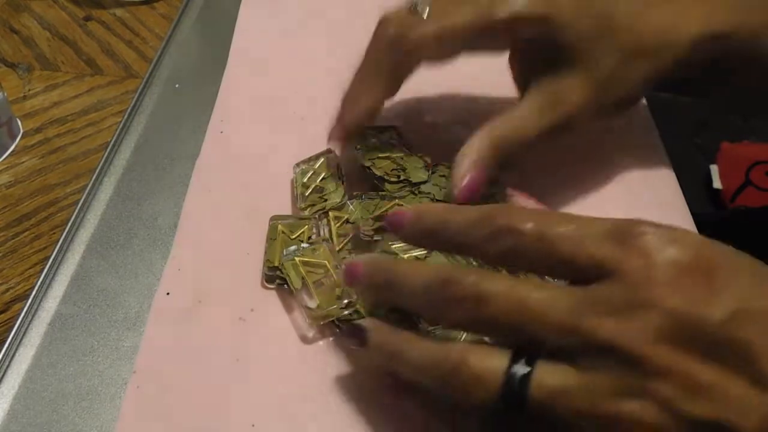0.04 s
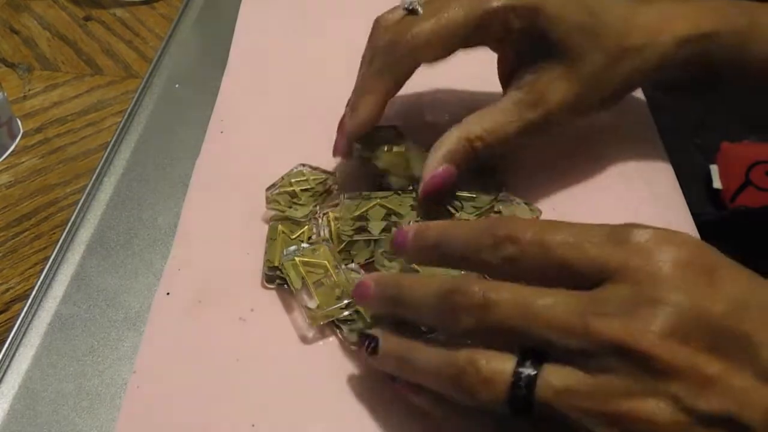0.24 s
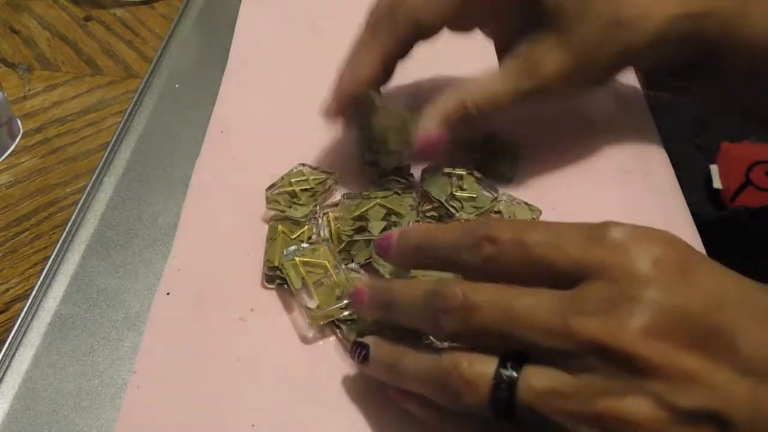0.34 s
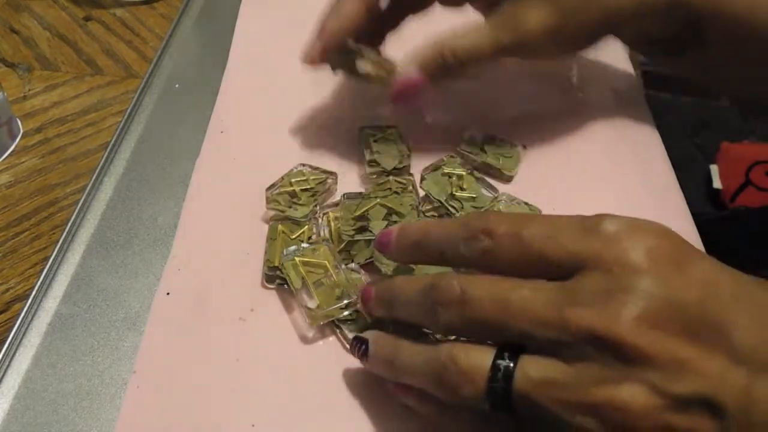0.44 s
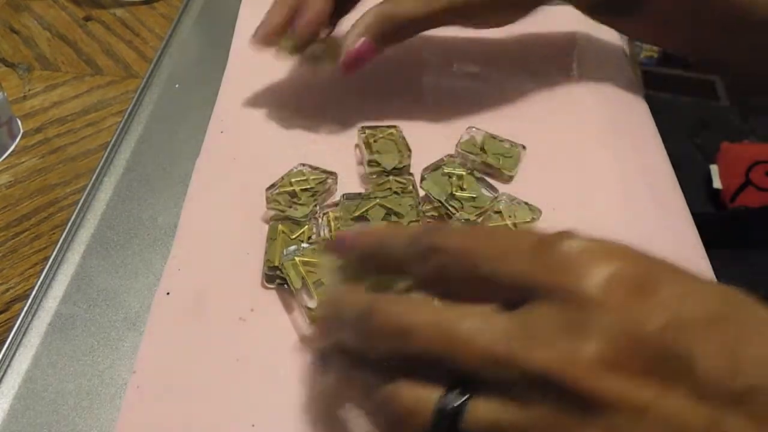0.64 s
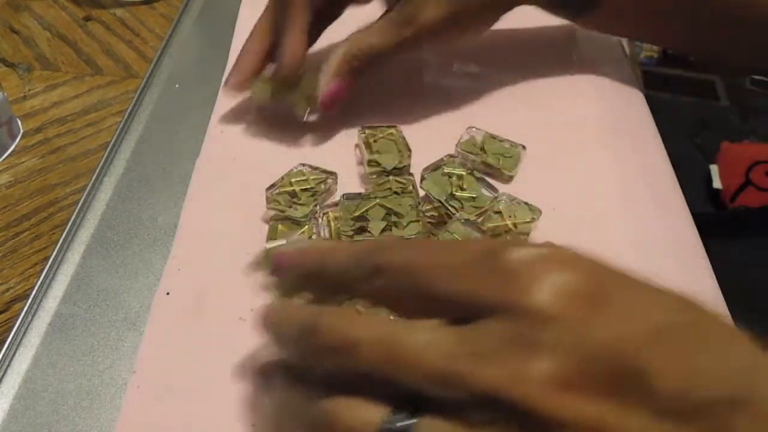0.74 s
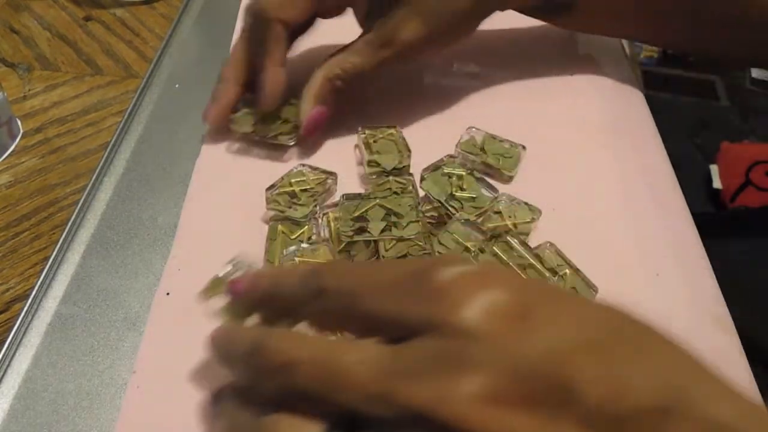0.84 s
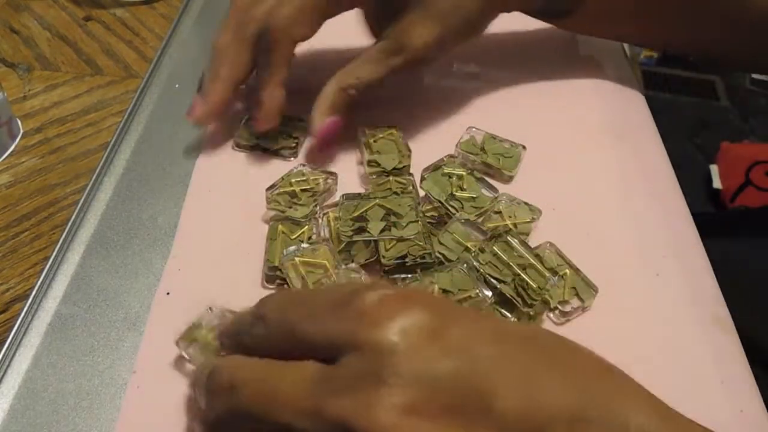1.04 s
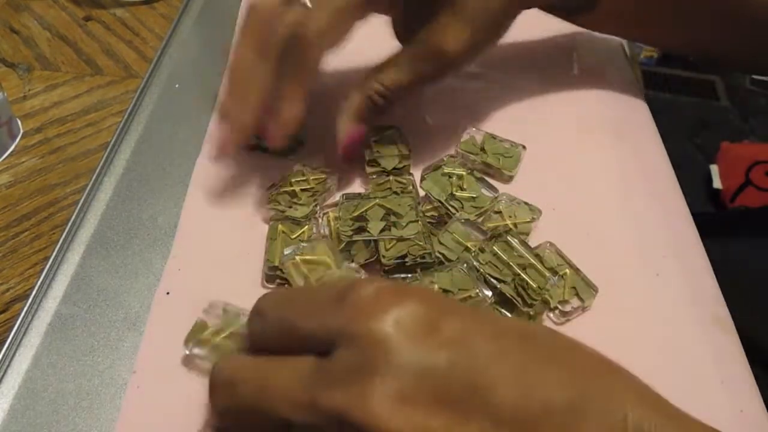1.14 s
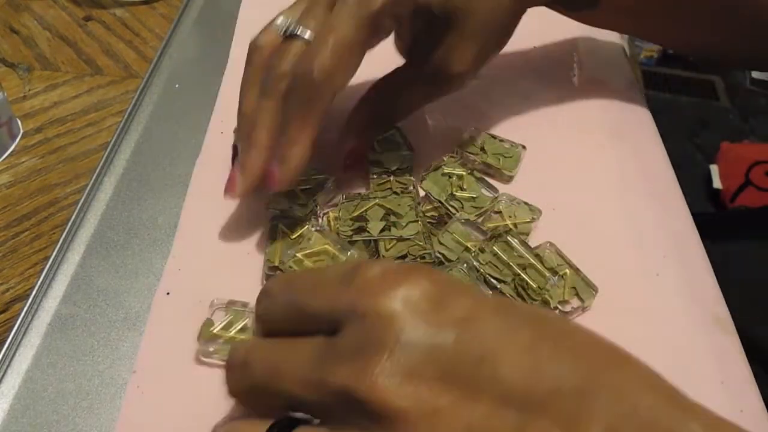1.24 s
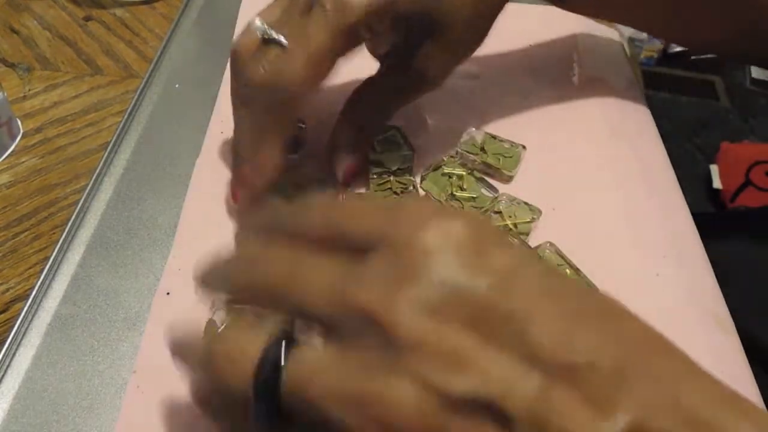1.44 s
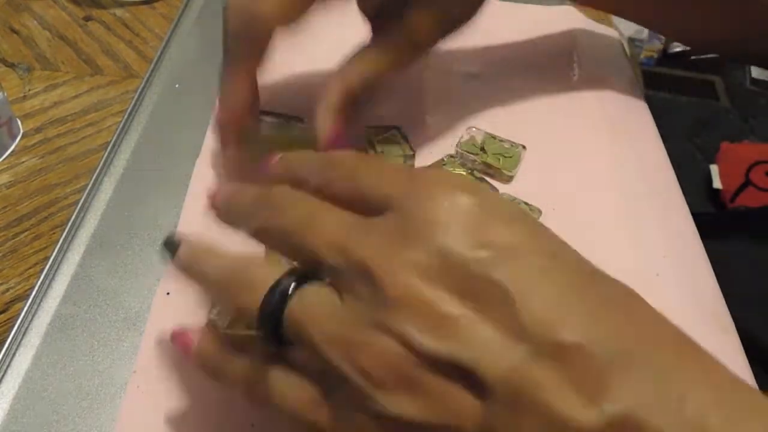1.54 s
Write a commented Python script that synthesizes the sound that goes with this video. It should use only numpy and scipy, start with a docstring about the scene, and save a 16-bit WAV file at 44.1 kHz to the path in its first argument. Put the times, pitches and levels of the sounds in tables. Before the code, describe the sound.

Hard resin stones click and knock against each other as hands spread them on a table.

```python
"""Hands spread hard resin stones over a mat on a table, close up, in the hush of a small quiet room.
First the stones tick brightly against each other, knock the tabletop lightly and slide softly on the mat.
At 0.4 s one lands hard and the tabletop rings briefly. A few faint touches follow; from 0.8 s a longer
slide runs under more ticks and knocks as stones drop or tip over. A heavy, duller knock at 1.2 s
dies away into the hush."""
import sys
import numpy as np
from scipy import signal
from scipy.fft import rfft, irfft
from scipy.io import wavfile

SR = 44100
rng = np.random.default_rng(int(sys.argv[2]) if len(sys.argv) > 2 else 0)


def wav_record(signal):
    """Record a signal, one row per channel, as 16-bit PCM in the file named by sys.argv[1]."""
    frames = np.transpose(np.atleast_2d(signal))
    bounded = np.clip(frames, -1, 1)
    # unit amplitude maps onto the largest positive 16-bit level
    quanta = np.round(bounded * 32767).astype(np.int16)
    wavfile.write(sys.argv[1], SR, quanta)


N = 70560
TAIL_S, TOP_HZ = 0.4, 15900  # time each hit gets to ring out; upper edge of the mix


def undb(db):
    """Decibels to gain."""
    return 10 ** (np.asarray(db) / 20)


def pan(db):
    """Left and right gains for a level difference."""
    return undb(db * np.array([[1], [-1]]) / 2)


def cut(x, hz, kind, order):
    """Low-pass or high-pass."""
    return signal.sosfilt(signal.butter(order, hz, kind, fs=SR, output="sos"), x)


def resonance(x, hz, q):
    """Band-pass with gain 1 at the centre."""
    return signal.lfilter(*signal.iirpeak(hz, q, fs=SR), x)


def add(out, sound, start_s, db):
    """Mix a sound in at its time and level."""
    i = int(start_s * SR)
    out[:, i:i + sound.shape[-1]] += (sound * undb(db))[:, :N - i]


def curve(table, size, column=1):
    """A table column drawn as a curve across the spectrum, on a log frequency axis."""
    rows = np.array(table, float)
    return np.interp(np.log(np.fft.rfftfreq(size, 1 / SR) + 1), np.log(rows[:, 0]), rows[:, column])


def stereo_noise(table, size):
    """Spectra of left and right noise; the table's last column sets the width."""
    mid, side = rfft(rng.standard_normal((2, size)))
    side = side * undb(curve(table, size, column=-1))
    return (mid + side * np.array([[1], [-1]])) * undb(curve(table, size))


def wash(table, t):
    """A noise tail that dies away at its own rate in each half octave."""
    noise, rows = stereo_noise(table, len(t)), np.array(table, float)
    octave = np.log2(np.fft.rfftfreq(len(t), 1 / SR) + 1)
    out = 0
    for centre in np.arange(6, 14.6, .5):
        band = np.maximum(1 - 2 * abs(octave - centre), 0)
        t60 = np.interp(centre, np.log2(rows[:, 0]), rows[:, 2])
        out = out + irfft(noise * band, len(t)) * np.exp(-np.log(1000) * t / t60)
    return out


def ring(modes, t, scatter_db):
    """Decaying modes of alternating sign; their strengths vary at random, as with the spot struck."""
    spot = undb(scatter_db * rng.standard_normal(len(modes)))
    out = 0
    for k, (hz, db, t60) in enumerate(modes):
        decay = np.exp(-np.log(1000) * t / t60)
        out = out + (-1) ** k * spot[k] * undb(db) * np.sin(2 * np.pi * hz * t) * decay
    return out


def pulse(table, size):
    """The tightest causal click with a given spectrum (minimum phase)."""
    cepstrum = irfft(np.log(undb(curve(table, size))), size)
    cepstrum[1:size // 2] *= 2
    cepstrum[size // 2 + 1:] = 0
    return irfft(np.exp(rfft(cepstrum)), size)


# colour of the room's hush (frequency [Hz], relative level [dB], stereo side [dB])
HUSH_EQ = [(19.4, -41.5, -26), (50, -46.5, -7), (79, -40, -12), (130, -44.5, -11), (318, -44.5, -6.5),
           (750, -42, -8), (1330, -46, -3), (2550, -55, -1), (4840, -67.5, 1.5), (7400, -71, 0),
           (15000, -72.5, 0.5)]


def room_tone():
    """The steady hush of the room, a bed under everything."""
    return undb(-3) * irfft(stereo_noise(HUSH_EQ, N), N)


# cues for stone against stone (time [s], level [dB], brightness [dB per octave], pitch [ratio])
TICK_CUES = [(0.086, -12, -0.5, 0.92), (0.119, -15.5, 0.5, 0.81), (0.1490, -3, -1.5, 1.05),
             (0.1543, 0, -1, 0.97), (0.176, -32, 6, 0.58), (0.206, -15.5, -9, 0.57), (0.2202, -10, -9, .7),
             (0.2314, -12.5, 5, 1.15), (0.2783, -23, -7.5, 0.71), (0.528, -20, -4.5, 0.91),
             (0.832, -27.5, 2, 1.3), (0.9204, -28, 3.5, 0.85), (1.0002, -11.5, -5.5, .56),
             (1.0123, -29, 6, 1.25), (1.034, -23, -5, 1.5)]
# ring of a stone (frequency [Hz], level [dB], t60 [s])
STONE_RING = [(2770, -54, 0.019), (3904, -44, 0.011), (5170, -48, 0.0068), (6460, -52, 0.0075),
              (7430, -40, 0.012), (12170, -44.5, 0.0065), (13000, -54, .008)]
# room tail of a tick (frequency [Hz], level [dB], t60 [s], stereo side [dB])
TICK_TAIL = [(500, -56, 0.069, -6), (2600, -42, 0.11, -8), (6850, -54.5, 0.17, 1.5),
             (14500, -60.5, 0.24, 1)]


def stone_ticks():
    """Edges meet with a snap, a very short bright ring (higher for smaller stones) and a trace of room."""
    out, t = np.zeros((2, N)), np.arange(int(TAIL_S * SR)) / SR
    snap_db, snap_decay_s = -33.5, 0.00068
    for start, db, tilt_db, pitch in TICK_CUES:
        snap = rng.standard_normal((2, len(t))) * np.exp(-t / snap_decay_s)
        snap = cut(snap, hz=3000, kind="high", order=1)
        snap = cut(snap, hz=14000, kind="low", order=2)
        tick = undb(snap_db) * snap + ring(STONE_RING, t * pitch, scatter_db=5.0) + wash(TICK_TAIL, t)
        tilt_eq = pulse([(1500, -2 * tilt_db), (12000, tilt_db)], len(t))
        add(out, signal.fftconvolve(tick, tilt_eq[None])[:, :len(t)], start, db)
    return out * pan(db=-0.5)


# cues for stones landing; the harder the contact, the higher the cutoff
# (time [s], level [dB], cutoff [Hz], frequency the struck spot favours [Hz], bass shelf [dB])
KNOCK_CUES = [(0.0891, -19, 347, 390, 5.5), (0.156, -31, 1800, 500, 3.5), (0.1758, -30.5, 1150, 540, 9),
              (0.1790, -18.5, 750, 540, -4.5), (0.2115, -20.5, 800, 800, 0), (0.2205, -22, 940, 685, 6),
              (0.2315, -18, 790, 530, 0.5), (0.3918, -0.5, 4080, 820, -9.5), (0.530, -35.5, 1000, 497, 6),
              (0.598, -37, 970, 864, -3), (0.820, -26, 750, 507, 1.5), (0.828, -29.5, 740, 455, 4),
              (0.9685, -17, 696, 480, 1.5), (1.0038, -15.5, 775, 740, 4.5), (1.0145, -14.5, 670, 574, -0.5),
              (1.081, -34, 550, 490, 8), (1.168, -30, 600, 456, 3.5), (1.2040, -3.5, 586, 422, 2),
              (1.2125, -23.5, 2100, 2080, -18), (1.230, -22, 705, 790, -14)]
# attack of a landing (frequency [Hz], relative level [dB])
CRACK_EQ = [(120, -53), (330, -13), (480, 0.5), (850, 11.5), (1700, -2.5), (3300, 8.5), (4700, -33),
            (7500, -34), (15000, -40)]
# ring of the tabletop (frequency [Hz], level [dB], t60 [s])
TABLE_RING = [(200.2, -46.5, .22), (256.3, -47.5, 0.3), (384.3, -42.5, 0.15), (427.5, -30.5, 0.17),
              (474.4, -27.5, 0.11), (506.7, -27.5, 0.1), (612.5, -40.5, 0.16), (734.6, -26, 0.097),
              (797.6, -24.5, 0.15), (846.3, -25, 0.097), (1096, -34.5, 0.13), (1179, -26, 0.16),
              (1276, -35.5, .14), (1474, -38, 0.24), (2034, -36.5, .14), (2820, -33, 0.13)]
# tail of the table's dense weaker modes and the room's reflections
# (frequency [Hz], relative level [dB], t60 [s], stereo side [dB])
KNOCK_TAIL = [(129.6, -33, .27, -9), (252, -14, 0.21, -23), (322, -17, 0.2, -34), (496, -2, 0.17, -21),
              (644, -8, 0.2, -13), (815, -1.5, 0.13, -22), (1000, -13.5, 0.15, -0.5),
              (1850, -12, 0.19, -4.5), (2920, -19.5, .14, -2), (4840, -29.5, 0.14, -2),
              (7800, -33.5, 0.22, 0), (15700, -23.5, 0.27, 0)]
# how the table's sound sits between the two microphone ports (frequency [Hz], left minus right [dB])
TABLE_PAN = [(200, 0.5), (480, 2.1), (800, 2), (1450, 3.5), (2200, -1.5), (5000, 1)]


def table_knocks():
    """Each landing cracks and rings the tabletop; the spot colours it, a softer contact dulls it."""
    out, t = np.zeros((2, N)), np.arange(int(TAIL_S * SR)) / SR
    crack = undb(2) * pulse(CRACK_EQ, len(t))
    punch_db, punch_s, spot_lift_db = 3.5, 0.0058, 3.5
    # the body is stronger in its first few milliseconds
    punch = undb(punch_db * np.exp(-(t / punch_s) ** 2))
    for start, db, cutoff_hz, spot_hz, bass_db in KNOCK_CUES:
        body = ring(TABLE_RING, t, scatter_db=0.5) + undb(-3) * wash(KNOCK_TAIL, t)
        knock = crack + punch * body
        knock = knock + (undb(spot_lift_db) - 1) * resonance(knock, spot_hz, q=2.15)
        knock = knock + (undb(bass_db) - 1) * cut(knock, hz=457, kind="low", order=1)
        # rough contact lets a little treble through even in soft landings
        treble = cut(knock, hz=4500, kind="high", order=4)
        grit = undb(-22) * cut(treble, hz=7000, kind="low", order=1)
        add(out, cut(knock, cutoff_hz, "low", order=2) + grit, start, db)
    out = cut(out, hz=139, kind="high", order=3)  # the knocks carry little low end
    return irfft(rfft(out) * pan(curve(TABLE_PAN, N)), N)


# cues for pushes across the mat (time [s], length [s], level [dB])
SLIDE_CUES = [(0.108, 0.12, -51), (0.53, 0.064, -71), (0.798, 0.32, -56.5)]
# colour of stone rubbing on the mat (frequency [Hz], relative level [dB])
SLIDE_EQ = [(100, -36), (450, 12.5), (850, 5), (1600, -13), (4000, -19.5), (15000, -34)]


def mat_slides():
    """Grainy friction of stones on the mat swells and fades with each push."""
    t = np.arange(N) / SR
    grain_depth, grain_samples = 0.3, 100
    noise = rng.standard_normal(N)
    roughness = np.repeat(rng.standard_normal(N // grain_samples + 1), grain_samples)[:N]
    grains = noise * np.exp(grain_depth * roughness)
    rub = irfft(rfft(grains) * undb(curve(SLIDE_EQ, N)), N)
    push = sum(undb(db) * np.sin(np.pi * np.clip((t - start) / length, 0, 1))
               for start, length, db in SLIDE_CUES)
    return push * rub / rub.std()


def scene():
    """The mix: knocks, ticks and slides over a bed of room tone."""
    return table_knocks() + stone_ticks() + mat_slides() + room_tone()


def record(dry):
    """A steep low-pass trims the very top of the mix."""
    return signal.sosfilt(signal.ellip(8, .2, 70, TOP_HZ, fs=SR, output="sos"), dry)


dry = scene()
out = record(dry)
wav_record(out)
```